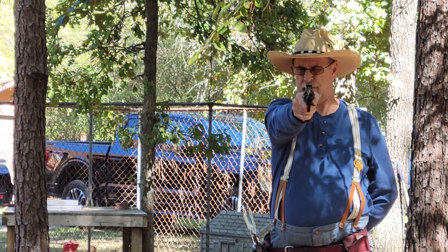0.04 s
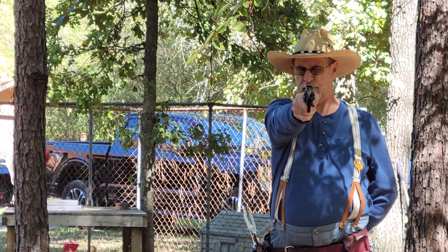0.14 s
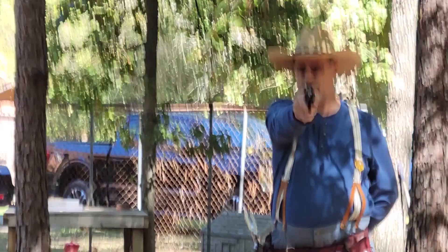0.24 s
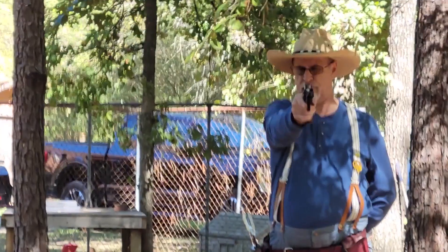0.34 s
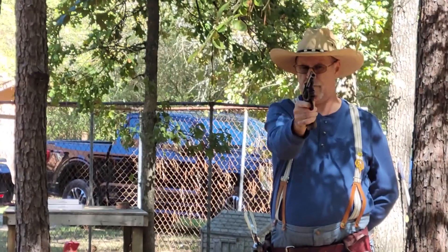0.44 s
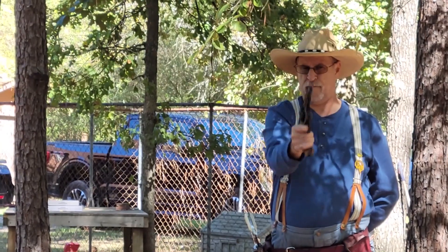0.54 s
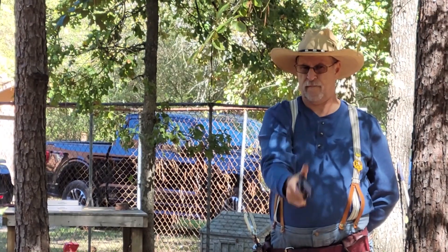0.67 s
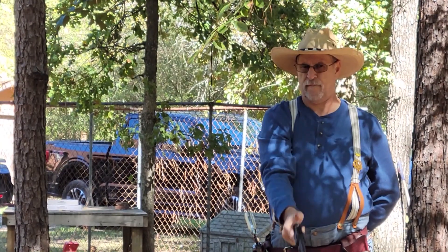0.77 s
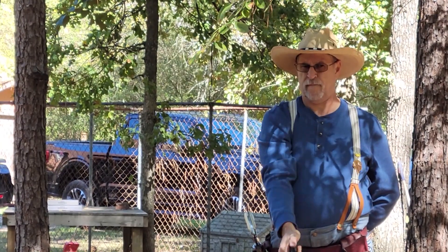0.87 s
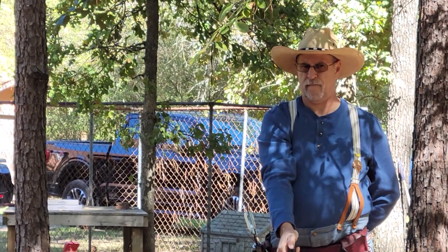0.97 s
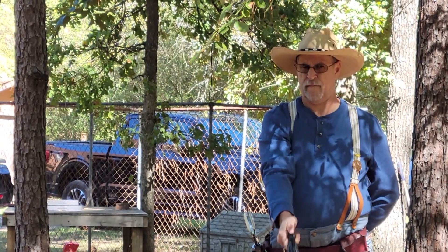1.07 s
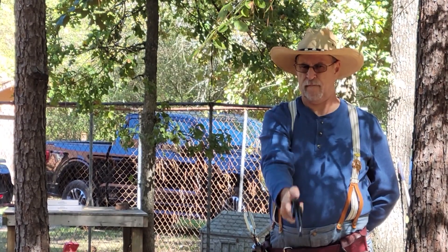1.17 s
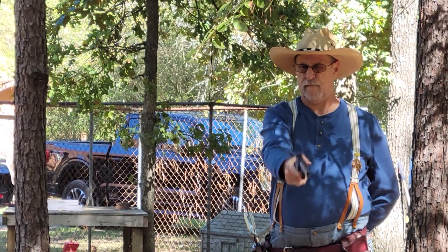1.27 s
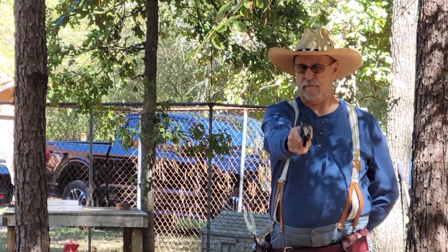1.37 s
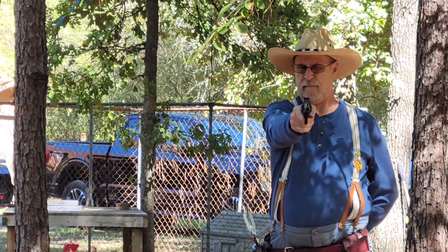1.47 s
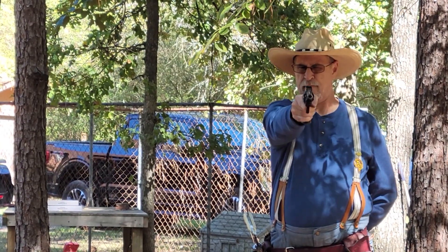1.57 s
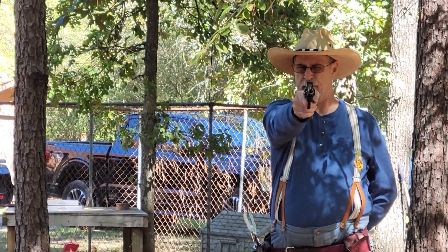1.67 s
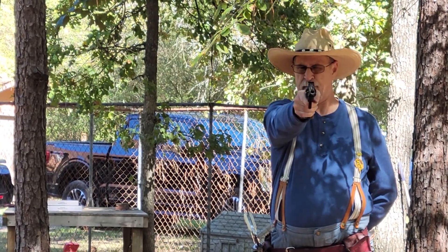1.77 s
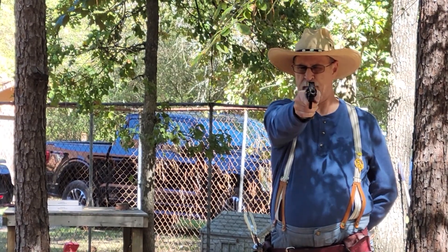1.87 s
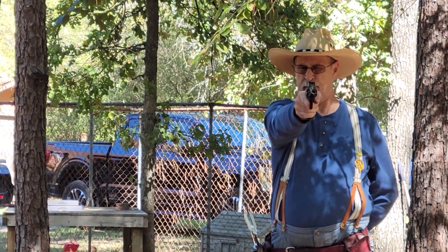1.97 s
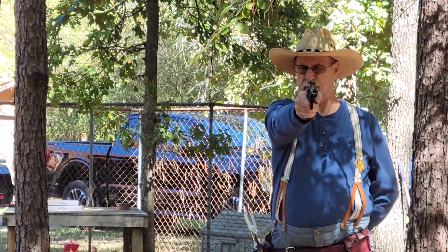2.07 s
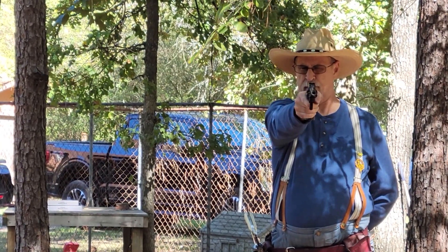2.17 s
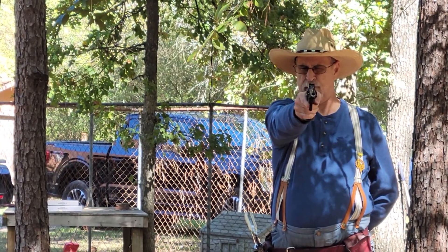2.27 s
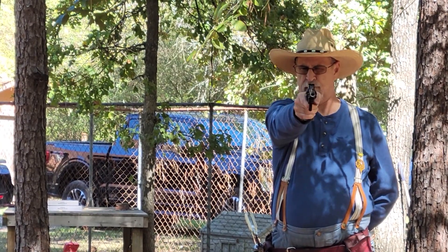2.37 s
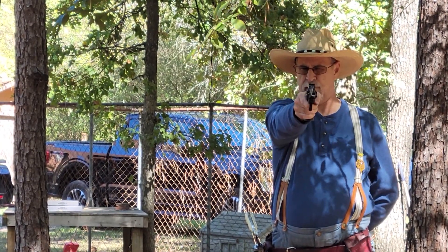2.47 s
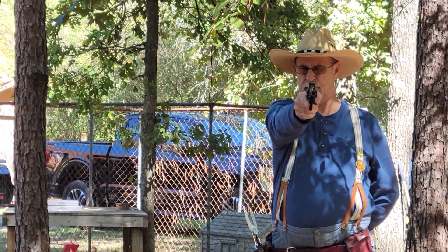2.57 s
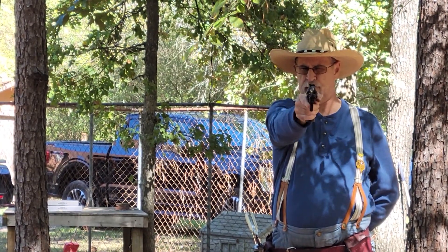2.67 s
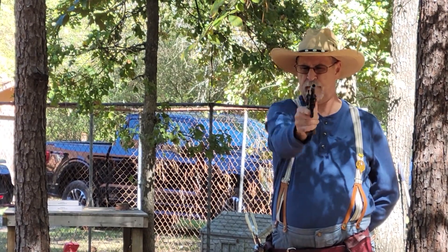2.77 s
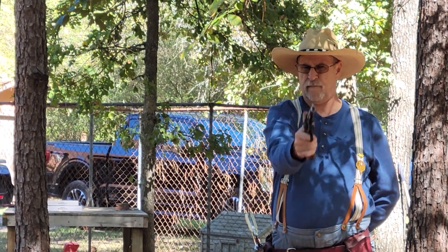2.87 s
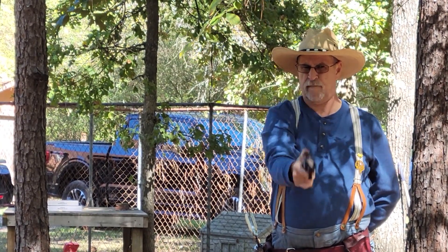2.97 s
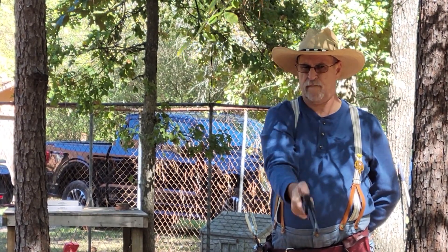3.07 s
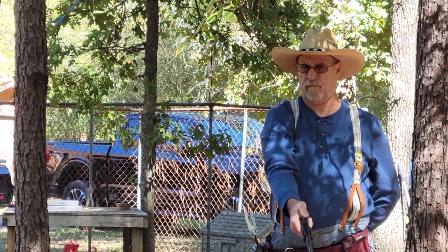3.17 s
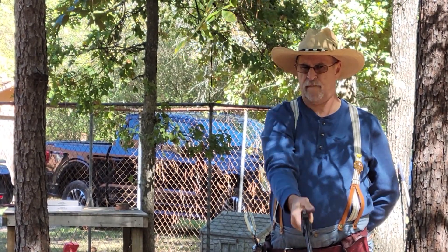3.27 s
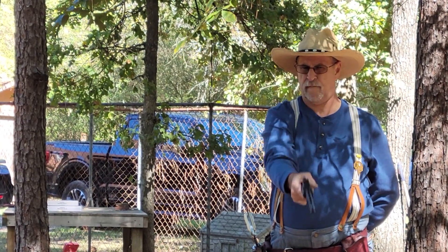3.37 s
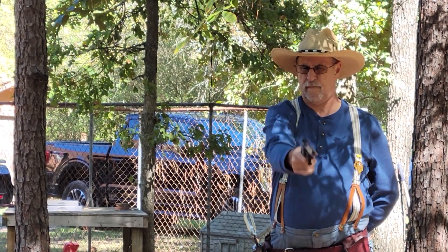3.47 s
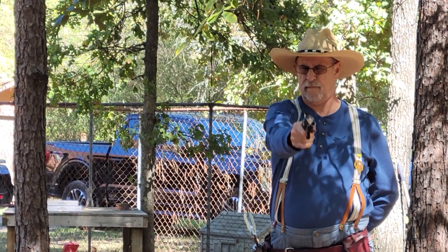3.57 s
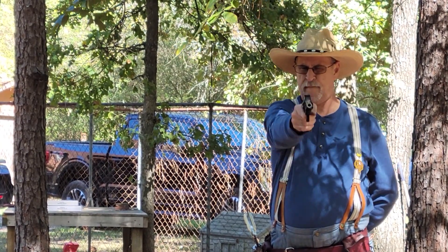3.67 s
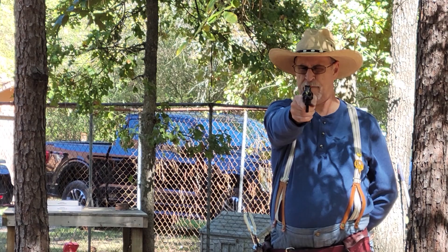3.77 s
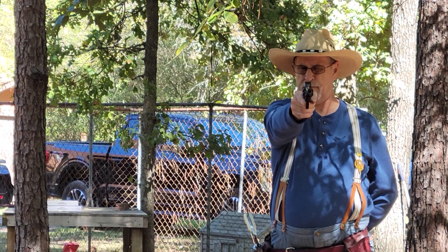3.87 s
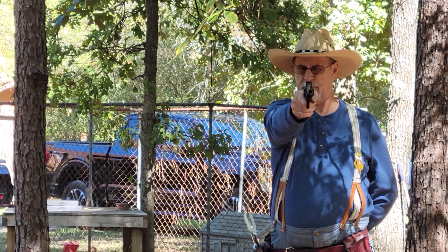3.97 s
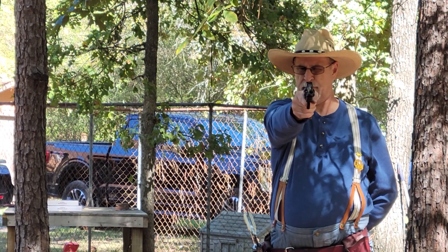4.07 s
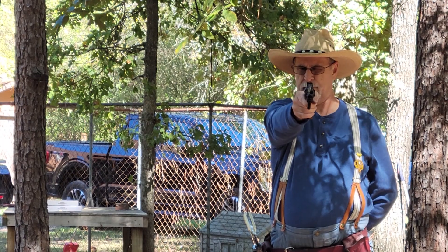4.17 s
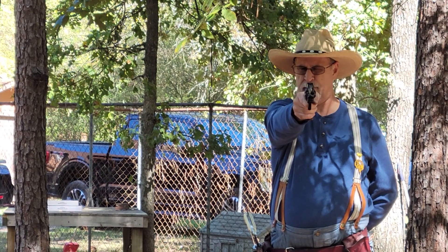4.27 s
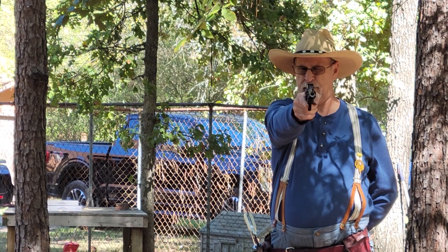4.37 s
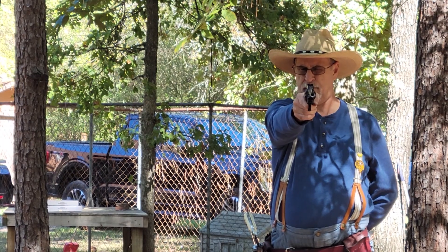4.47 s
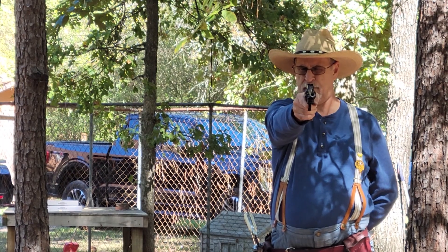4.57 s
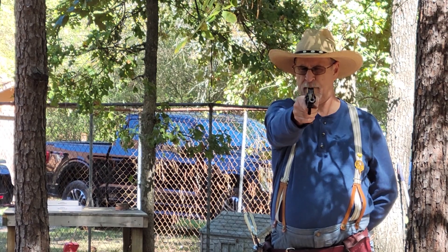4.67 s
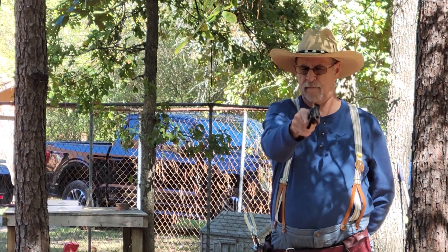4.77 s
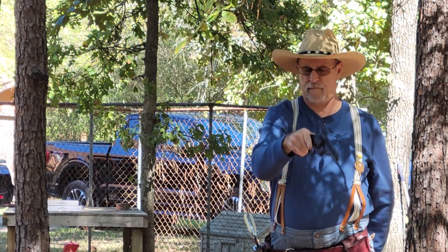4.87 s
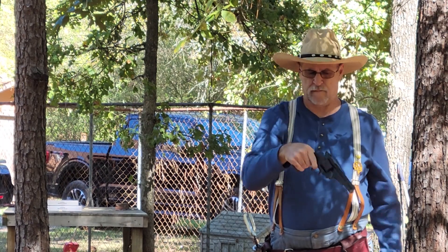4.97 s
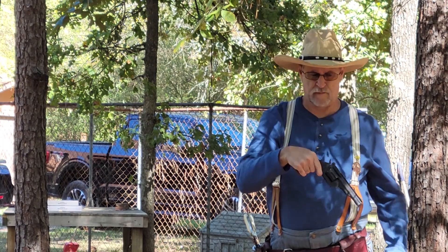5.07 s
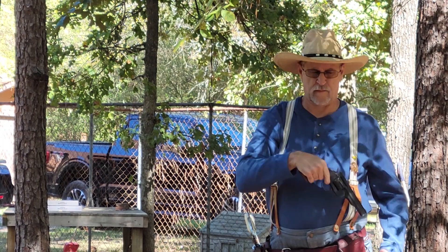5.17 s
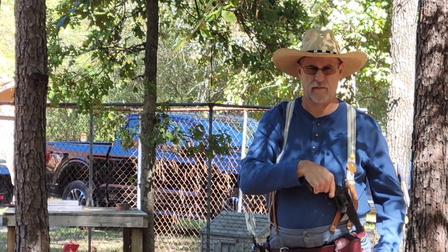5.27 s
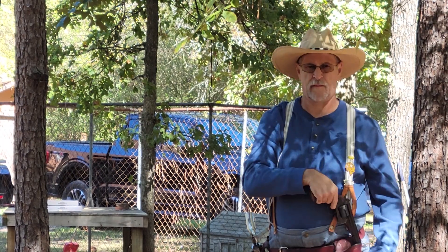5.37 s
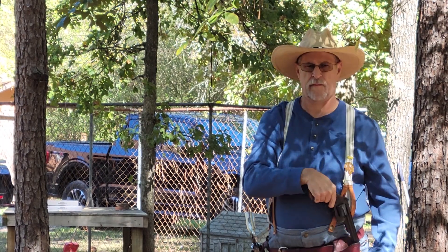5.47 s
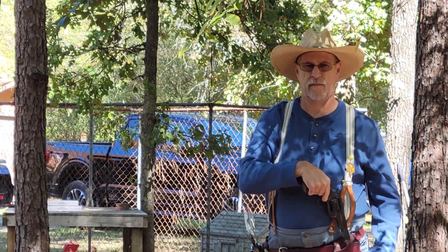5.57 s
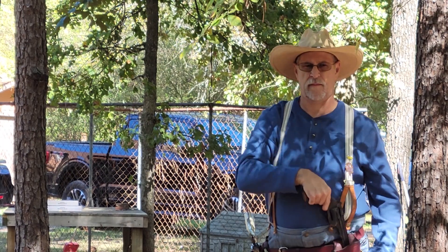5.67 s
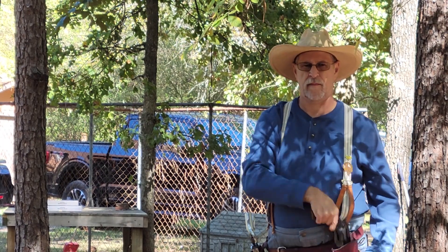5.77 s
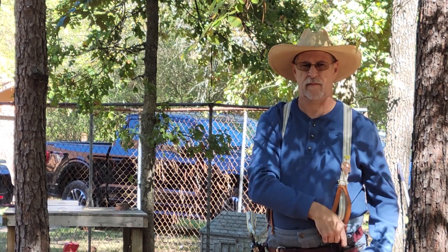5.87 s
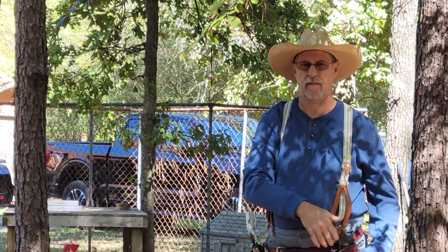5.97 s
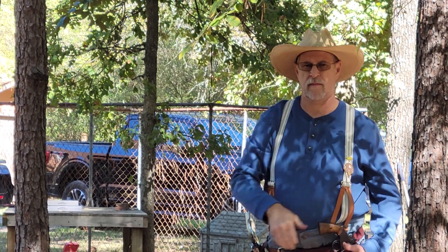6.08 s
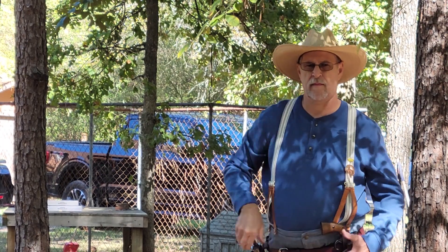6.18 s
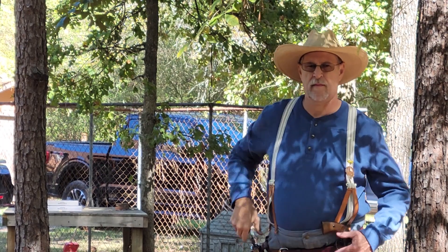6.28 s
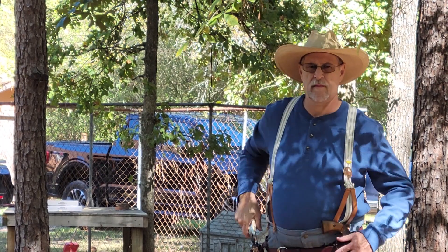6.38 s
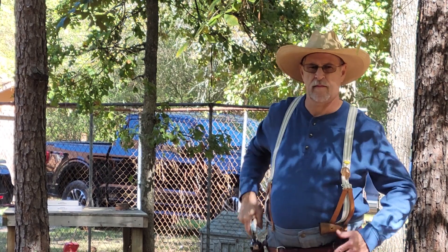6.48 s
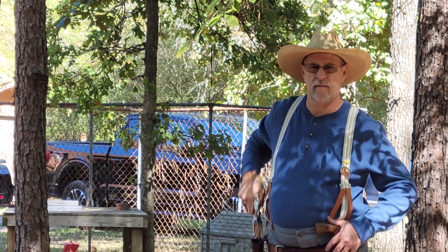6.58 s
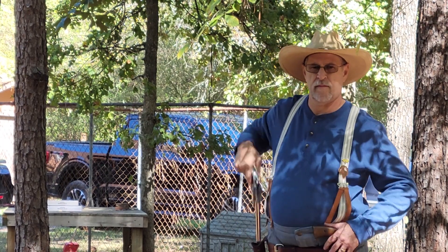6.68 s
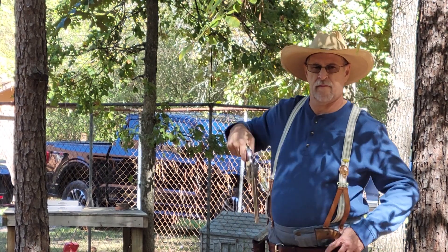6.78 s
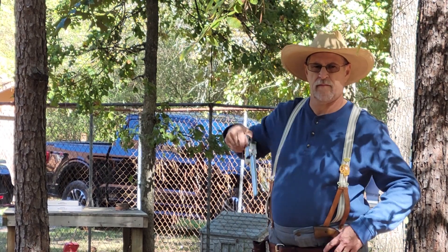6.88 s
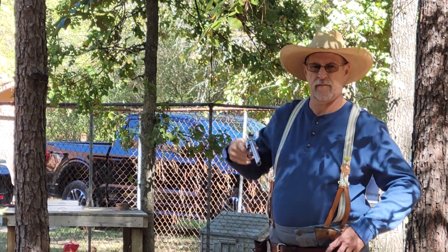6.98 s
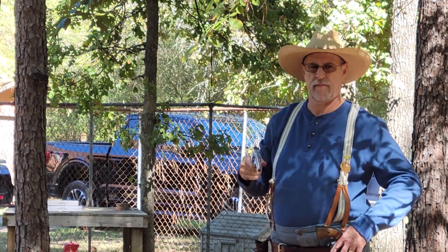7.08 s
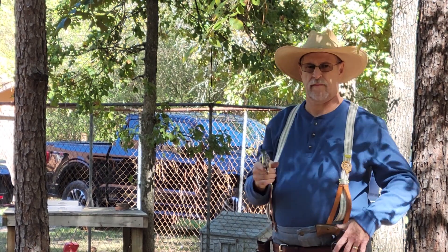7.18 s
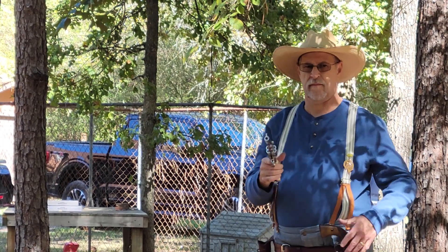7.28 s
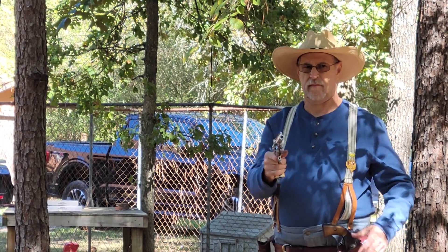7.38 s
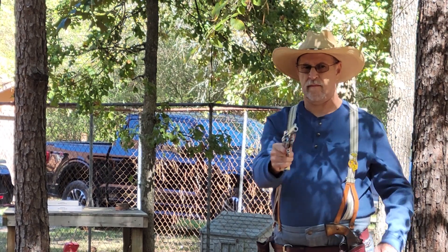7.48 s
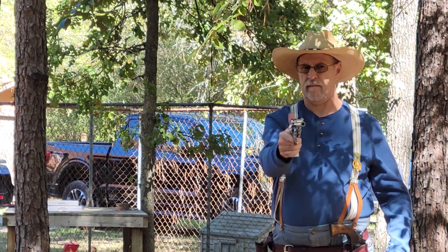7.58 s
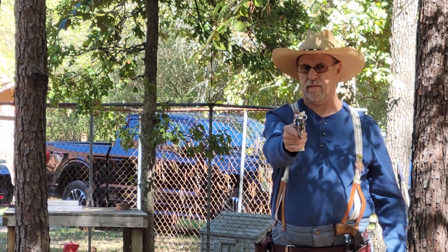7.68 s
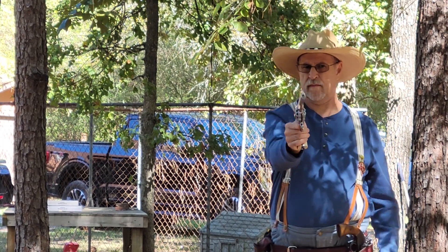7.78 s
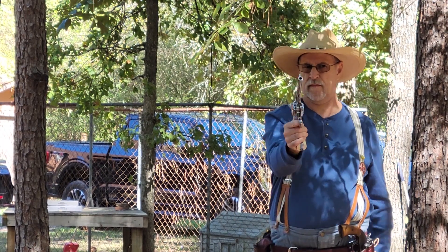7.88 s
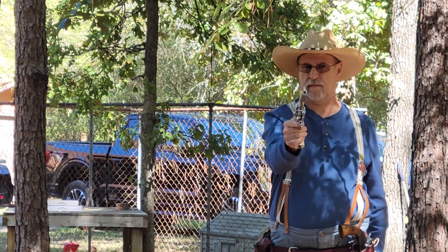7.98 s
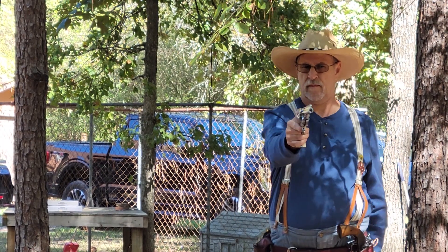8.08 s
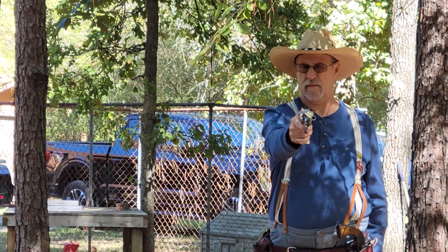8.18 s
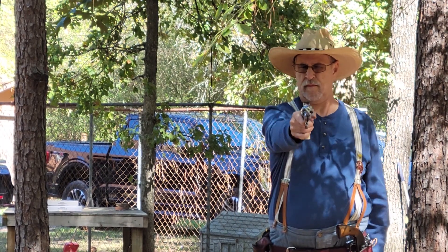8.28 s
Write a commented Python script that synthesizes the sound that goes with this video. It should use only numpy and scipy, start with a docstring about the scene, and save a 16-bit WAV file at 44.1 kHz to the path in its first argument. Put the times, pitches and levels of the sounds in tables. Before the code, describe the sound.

A gas revolver some metres away fires three times in a wooded yard, roughly two seconds apart. Each dry, sharp crack scatters off trees and fence, and almost at once a pellet splashes brightly on a steel target beside the microphone. Bright metallic overtones fade quickly while a low bell tone hums on. Crisp cocking clicks come between shots; later there is only rumble, ringing, faint cloth rubbing and a final hard click.

```python
"""In a wooded yard, a gas revolver fires three times at a bell-like steel target close to the microphone.
Each crack is a puff of noise that echoes off nearby surfaces and trees. The pellet lands about 45 ms later
as a splash of noise, and the steel, a set of dying tones, rings on for seconds.
Clicks of the gun and rubbing cloth, both made of noise, are heard over a low rumble of filtered noise.
A limiter ducks the loudest moments."""
import sys
import numpy as np
from scipy import signal
from scipy.fft import rfft, irfft
from scipy.io import wavfile
from scipy.ndimage import uniform_filter1d, minimum_filter1d

SR = 44100
rng = np.random.default_rng(int(sys.argv[2]) if len(sys.argv) > 2 else 0)


def pcm_store(signal):
    """Save signal as 16-bit PCM."""
    levels = np.round(np.clip(np.atleast_2d(signal), -1, 1) * 32767)
    wavfile.write(sys.argv[1], SR, levels.astype(np.int16).T)


N = 367794

# The three shots. Each row: crack in seconds, relative crack level in dB,
# pellet's impact in seconds, relative impact level in dB.
SHOTS = [(.1176, -1, .160, -1), (2.4106, 0, 2.457, -2), (4.4401, 0, 4.4884, 0)]
# Colour of the gun's clicks and of the swell into each crack. Each row: frequency in Hz, level in dB.
CLICK_COLOUR = [(300, -41), (1000, -32.5), (1800, -10.5), (2600, -18.5), (4000, -10), (5500, -13.5),
                (7600, -7.5), (9000, -31), (13000, -22.5), (16000, -29.5)]


def gain_of(db):
    """Turns decibels into amplitude."""
    return 10 ** (np.asarray(db) / 20)


def read(points, hz):
    """Reads a table joined by straight lines on a log-frequency axis."""
    f, value = np.transpose(points)
    return np.interp(np.log(hz + 1), np.log(f), value)


def add(mix, s, sound):
    """Adds a sound to the mix at time s in seconds, cut off at the end of the mix."""
    part = mix[:, round(s * SR):][:, :sound.shape[-1]]
    part += sound[..., :part.shape[-1]]


def coloured(x, points, tilt_db=0, size=2048):
    """Filters a sound to a colour, tilted about 5 kHz (dB per octave), with nothing heard ahead of it."""
    hz = np.fft.rfftfreq(size, 1 / SR)
    octaves = np.log2(np.maximum(hz, 500) / 5000)
    log_gain = np.log(gain_of(read(points, hz) + tilt_db * octaves))
    # The Hilbert transform gives the phase that puts the energy as early as possible.
    circle = np.r_[log_gain, log_gain[-2:0:-1]]
    taps = np.fft.ifft(np.exp(np.conj(signal.hilbert(circle)))).real
    return signal.fftconvolve(x, taps[None], axes=1)


def burst(t60, likeness, size=4096):
    """A dying puff of noise of energy 1 in each channel; likeness is what left and right share (0-1)."""
    noise = rng.standard_normal((3, size)) * gain_of(-60 * np.arange(size) / SR / t60)
    share = np.clip(likeness, 0, 1)
    pair = np.sqrt(share) * noise[0] + np.sqrt(1 - share) * noise[1:]
    return pair / np.linalg.norm(pair, axis=1, keepdims=True)


def mode(t, hz, t60, db, pan_db, lead):
    """One dying tone, with its own level and phase (lead, in radians) at left and right."""
    sides = gain_of([[pan_db / 2], [-pan_db / 2]])
    sides = sides / np.sqrt(np.mean(sides ** 2))
    phase = 2 * np.pi * (hz * t + rng.random()) + np.array([[lead / 2], [-lead / 2]])
    return sides * gain_of(db - 60 * t / t60) * np.sin(phase)


def boom_db(steep=2.0):
    """Level of the rumble: one smooth rise and slower fall after each shot."""
    rest_db, peak_s = -2, .42
    # Height of the swell after each shot, in dB.
    heights_db = [7.5, 4, 4]
    level_db = np.full(N, float(rest_db))
    for (s, *_), height_db in zip(SHOTS, heights_db):
        age = np.maximum(np.arange(N) / SR - s, 0) / peak_s
        level_db = level_db + height_db * (age * np.exp(1 - age)) ** steep
    return level_db


def outdoors(rumble_edge_hz=220):
    """Noise split into a distant rumble, swelling after each shot, and faint steady air noise."""
    # Background before drones and swells. Each row: frequency in Hz, level in dB per Hz.
    air = [(22, -83), (40, -72.5), (62, -62), (100, -59), (165, -75), (300, -79.5), (600, -85.5),
           (1300, -91.5), (2200, -103), (4600, -123), (7400, -114), (8500, -140), (12300, -135),
           (16000, -147)]
    # How alike left and right are. Each row: frequency in Hz, likeness from 0 to 1.
    air_likeness = [(30, .93), (250, 0.91), (700, 0.26), (2000, .4), (8000, 0.65)]
    # Droning bands in the rumble. Each row: frequency in Hz, width in Hz, boost in dB.
    drone = [(88.6, 4.1, 5.5), (105.6, 2.7, 4.5), (143.6, 15, 7.5), (209.3, 5.2, 5), (255.9, 4, 8)]
    hz = np.fft.rfftfreq(N, 1 / SR)
    a, b = rfft(rng.standard_normal((2, N)))
    same = np.clip(read(air_likeness, hz), -1, 1)
    pair = np.array([a, same * a + np.sqrt(1 - same ** 2) * b])
    spectrum = pair * gain_of(read(air, hz)) * np.sqrt(SR / 2)
    drone_db = sum(db / (1 + (2 * (hz - f) / width) ** 2) for f, width, db in drone)
    spectrum = spectrum * gain_of(drone_db)
    low = 1 / (1 + (hz / rumble_edge_hz) ** 4)
    rumble = irfft(spectrum * low, N)
    return gain_of(boom_db()) * rumble + irfft(spectrum * (1 - low), N)


def target(ring_db=0.06, release_s=0.079, release_share=.15):
    """Each hit starts the steel's modes anew; they die away, each at first held back by its own amount."""
    # Tones of the steel; each pellet lands on another spot and leaves another mix.
    # Each row: frequency in Hz, time to fall 60 dB in seconds, level in dB after hits 1, 2 and 3,
    # left over right in dB, left's phase lead in radians.
    steel = [ (467, 26, -32, -19.7, -19.3, -1.5, -.3), (832, 1.7, -60, -34, -34, 0, -1.1),
             (1045, 8.5, -52, -59, -43, 6, -2.1), (1173, 10, -36, -51, -38, 12, 2.5),
             (1370, .6, -55, -38, -39, 0, -1), (1480, 5.2, -25, -56, -43, 6, -1),
             (1900, .3, -40, -25, -25, 0, -1), (1990, 1.28, -31, -44, -34, 6, -2.8),
             (2741, 1.45, -15, -43, -19, 6, -1.9), (2800, 1.8, -38, -44, -32, 0, -1.5),
             (3080, .47, -41, -44, -27, -5, -1.9), (3169, 1.17, -18, -31, -17, 6, -2.1),
             (3486, .74, -1, -34, -20, 3, -2.1), (3870, .54, -21, -11, -22, -1, -.5),
             (3932, .41, -16, -18, -20, -5, -.4), (4266, .71, -12, -32, -37, -3, 1.2),
             (4288, 1.29, -31, -24, -26, 4, -3.1), (4334, .6, -37, -15, -14, -4, 2.5),
             (4712, .61, -24, -43, -21, -9, 2.1), (5418, .55, -30, -26, -10, -20, -3.1),
             (6109, .52, -16, -35, -20, 1, 2.2), (6204, .5, -21, -52, -41, 15, -2.5),
             (6574, .56, -34, -16, -17, 0, 2.2), (7429, .47, -26, -9, -14, -8, .4),
             (7588, .51, -22, -33, -20, -11, -2.7), (9026, .39, -26, -32, -18, 14, 3),
             (9892, .44, -29, -44, -35, 3, .3), (10529, .38, -20, -40, -19, 13, -.1),
             (10814, .39, -23, -39, -14, 16, -1.5), (11692, .31, -10, -5, -11, 10, -1.5),
             (11958, .32, -24, -6, -6, -13, -2.6), (12205, .38, -13, -26, -28, -2, -2.7),
             (13011, .27, -18, -17, -40, 16, 1.3), (13787, .26, -11, -25, -13, -7, -1.4),
             (13908, .2, -5, -35, -5, 14, -1.5), (14918, .33, -13, -45, -16, -1, 1.3),
             (15215, .36, -18, -28, -30, 16, .8)]
    # Tones already ringing at the start. Each row: frequency in Hz, level in dB.
    ringing = [(467, -31), (1045, -55), (1173, -52)]
    # Tones are held back by differing amounts at each hit, as by a limiter, the very top slightly raised.
    # Each row: frequency in Hz, dB held back at the hit.
    held_back = [(467, 12), (1500, 11), (3200, 13.5), (4300, 7.5), (7400, 3), (12000, 8), (15000, -1.5)]
    out = np.zeros((2, N))
    hits = [shot[2] for shot in SHOTS] + [N / SR]
    t = np.arange(round(hits[0] * SR)) / SR
    for hz, db in ringing:
        # All of these die and spread like the first tone of the steel.
        add(out, 0, mode(t, hz, steel[0][1], db, *steel[0][-2:]))
    for k in range(len(SHOTS)):
        # The ring stops where the next hit starts.
        t = np.arange(round(hits[k + 1] * SR) - round(hits[k] * SR)) / SR
        for hz, t60, *levels, pan_db, lead in steel:
            # The hold shrinks to nothing, sooner for short tones.
            hold = np.maximum(1 - t / min(release_s, release_share * t60), 0)
            level_db = levels[k] + ring_db - hold * read(held_back, hz)
            add(out, hits[k], mode(t, hz, t60, level_db, pan_db, lead))
    return out


def lead_in(swell_db=11, rise_t60=0.055, tilt_db=2, low_db=-26, low_hz=170, low_t60=0.054, lead_s=0.014):
    """A reversed puff of noise swells into each crack, with a short low tone just before it."""
    out, t = np.zeros((2, N)), np.arange(SR // 4) / SR
    low_tone = gain_of(low_db - 60 * t / low_t60) * np.sin(2 * np.pi * low_hz * t)
    for s, *_ in SHOTS:
        swell_in = burst(rise_t60, 0.44)[:, ::-1]
        add(out, s - swell_in.shape[1] / SR, gain_of(swell_db) * coloured(swell_in, CLICK_COLOUR, tilt_db))
        add(out, s - lead_s, low_tone)
    return out


def cracks(crack_db=13, crack_t60=0.0067, slap_db=3):
    """Gas bursts from the muzzle as puffs of noise; hard surfaces throw back single darker slaps."""
    # Colours of the burst and of the slaps. Each row: frequency in Hz, level in dB.
    blast = [(60, -11.5), (250, -11), (600, -5.5), (1100, -1), (2200, 1), (4500, 10), (7300, 5), (9500, -8),
             (13000, -7.5), (16000, -9)]
    slap = [(60, -6), (300, 2), (1000, 6), (3000, 5), (6500, 1), (9500, -10), (13000, -7), (16000, -9)]
    # Echoes from nearby surfaces. Each row: delay in seconds, relative level in dB.
    near_echoes = [(.0016, 0), (.0116, 7), (.0134, -3), (.0235, -3)]
    out = np.zeros((2, N))
    for s, db, _, _ in SHOTS:
        add(out, s, gain_of(db + crack_db) * coloured(burst(crack_t60, .75), blast))
        for delay, echo_db in near_echoes:
            add(out, s + delay, gain_of(db + slap_db + echo_db) * coloured(np.ones((2, 1)), slap))
    return out


def yard(x, rise=0.0021, near_db=5, near_s=.045, lumpy_db=3, far_db=4, far_s=0.51):
    """Trunks, leaves and fence echo as uneven dying noise: near ones strongest, far trees late, treble brief."""
    # Colour of the scatter. Each row: frequency in Hz, relative level in dB.
    scatter = [(100, 1.5), (500, -4), (1200, -6.5), (2500, -6), (5000, -0.5), (9000, 4), (15000, 7)]
    # Its basic decay. Each row: frequency in Hz, time to fall 60 dB in seconds.
    scatter_t60 = [(150, .55), (1000, .62), (3000, .58), (5000, .45), (7500, .35), (10000, .19),
                   (15000, .19)]
    hz, t, z = signal.stft(rng.standard_normal((2, SR)), SR, nperseg=256)
    t60 = read(scatter_t60, hz)[:, None]
    lumps = rng.standard_normal(z.shape[1:])
    lumps = uniform_filter1d(uniform_filter1d(lumps, size=12, axis=0), size=4, axis=1)
    near = near_db / (1 + (t / near_s) ** 4)
    far = far_db * (1 - 1 / (1 + (t / far_s) ** 4))
    level_db = read(scatter, hz)[:, None] - 60 * t / t60 + near + far + lumpy_db * lumps / lumps.std()
    tail = signal.istft(z * gain_of(level_db), SR, nperseg=256)[1][:, :SR]
    tail = tail * (1 - np.exp(-np.arange(SR) / SR / rise))
    tail = tail + 0.1 * tail[::-1]  # a little of each side in the other
    return signal.fftconvolve(x, tail / np.linalg.norm(tail[0]), axes=1)[:, :N]


def impacts(impact_db=16, impact_t60=0.031, spread_s=.003):
    """The pellet's splash of noise builds as it spreads over the steel, then dies."""
    # Colour of the splash. Each row: frequency in Hz, level in dB.
    splash_colour = [(200, -17.5), (800, -18), (2000, -10), (4000, 1), (7500, 6), (9500, -7.5),
                     (13000, -2.5), (16000, -3)]
    out = np.zeros((2, N))
    for _, _, s, db in SHOTS:
        splash = burst(impact_t60, 0.25)
        splash = splash * (1 - np.exp(-np.arange(splash.shape[1]) / SR / spread_s))
        add(out, s, gain_of(db + impact_db) * coloured(splash, splash_colour))
    return out


def shimmer(count=70):
    """Weak modes of the steel crowd between the strong ones; the higher they are, the sooner they die."""
    # Typical level of a weak mode before luck and hit strength. Each row: frequency in Hz, level in dB.
    overtones = [(1200, -42), (2000, -37), (3500, -34), (6000, -30), (8000, -29), (9800, -40), (12500, -25),
                 (15800, -25)]
    out, t = np.zeros((2, N)), np.arange(SR) / SR
    # One pitch at random in each of many equal steps.
    places = np.arange(count) + rng.random(count)
    pitches = np.interp(places, [0, count], [overtones[0][0], overtones[-1][0]])
    for hz in pitches:
        pan_db, lead = rng.uniform(-14.5, 6.2), rng.uniform(-np.pi, np.pi)
        t60 = .48 * np.sqrt(5000 / hz)
        for _, _, s, db in SHOTS:
            luck_db = rng.uniform(-16, 3)
            add(out, s, mode(t, hz, t60, db + read(overtones, hz) + luck_db, pan_db, lead))
    return out


def rattles():
    """The target jumps on its mount and pings, each ping one short tone."""
    # Each row: start in seconds, frequency in Hz, time to fall 60 dB in seconds, level in dB.
    pings = [(0.191, 1600, .04, -19), (.194, 2075, 0.33, -26.5), (2.509, 5170, .08, -28.5),
             (2.62, 5300, .1, -38)]
    out, t = np.zeros((2, N)), np.arange(SR // 2) / SR
    for s, hz, t60, db in pings:
        add(out, s, mode(t, hz, t60, db, 0, 0))
    return out


def action(click_db=9, click_t60=0.057, knock_hz=110, knock_t60=0.084, early_s=0.0051, early_db=-14):
    """Each click is a puff of noise with a dull knock, and a fainter puff just before softens its start."""
    # Hammer, cylinder and holster clicks. Each row: start in seconds, relative level in dB,
    # brightness in dB per octave, low knock in dB.
    clicks = [(.635, -38.5, 17, -67), (.808, -33.5, 8, -72), (.875, -28, -8, -63), (1.0096, -7, 1, -38),
              (2.9965, -14, 6, -52), (3.0771, -5.5, -2, -30), (3.2592, -25.5, -3.5, -75),
              (5.328, -36.5, -3, -69.5), (6.3256, -32, -3, -71), (7.009, -28, -3, -64.5),
              (8.018, -28.5, -2.5, -70), (8.101, -5, -1.5, -25)]
    out, t = np.zeros((2, N)), np.arange(SR // 4) / SR
    knock = np.sin(2 * np.pi * knock_hz * t) * gain_of(-60 * t / knock_t60)
    for s, db, tilt_db, knock_db in clicks:
        early_puff = coloured(burst(click_t60, .5), CLICK_COLOUR, tilt_db)
        add(out, s - early_s, gain_of(db + click_db + early_db) * early_puff)
        click = coloured(burst(click_t60, 0.34), CLICK_COLOUR, tilt_db)
        add(out, s, gain_of(db + click_db) * click)
        add(out, s, gain_of(knock_db) * knock)
    return out


def rustle(uneven_db=3, sleeve_rise_s=0.26):
    """Cloth and leather rub as noise of uneven level; each arm movement swells and fades as one arch."""
    # Arm movements as the guns are swapped.
    # Each row: middle in seconds, length in seconds, level in dB before colouring.
    rubs = [(5.837, .12, -67), (6.277, .4, -77.5), (7.082, 0.67, -76), (8.021, 0.41, -67.5)]
    # Colour of rubbing cloth and leather. Each row: frequency in Hz, level in dB.
    cloth = [(500, -11.5), (2000, 4), (3200, -0.5), (4600, -8), (7400, 4), (8600, -20.5), (12500, -16),
             (16000, -25)]
    sleeve_from_s, sleeve_db = 5.65, -83  # the sleeve brushes faintly from here to the end
    t = np.arange(N) / SR
    strokes = uniform_filter1d(rng.standard_normal(N), size=2000)
    level = gain_of(sleeve_db) * np.clip((t - sleeve_from_s) / sleeve_rise_s, 0, 1)
    for s, length, db in rubs:
        level = level + gain_of(db) * np.exp(-(2 * (t - s) / length) ** 2)
    level = level * gain_of(uneven_db * strokes / strokes.std())
    return coloured(level * rng.standard_normal((2, N)), cloth)[:, :N]


def scene(crack_wet_db=3, impact_wet_db=-12, click_wet_db=-11):
    """The gun is some metres off and wakes the yard; the target is near, and only its splash echoes faintly."""
    gun, splash, clicks = cracks(), impacts(), action()
    sent = gain_of(crack_wet_db) * gun + gain_of(impact_wet_db) * splash + gain_of(click_wet_db) * clicks
    revolver = gun + clicks + lead_in()
    steel_target = splash + target() + rattles() + shimmer()
    return revolver + steel_target + yard(sent) + rustle() + outdoors()


def record(dry, ceiling_db=-2.5, recovery_db_per_s=260):
    """A peak limiter clamps at once and lets go steadily; then a low-pass removes the top treble."""
    edge_hz = 16250
    over_db = np.maximum(20 * np.log10(abs(dry).max(0) + 1e-9) - ceiling_db, 0)
    # Hold each peak's excess while it shrinks at the recovery rate.
    fall = np.arange(N) / SR * recovery_db_per_s
    held_db = np.maximum.accumulate(over_db + fall) - fall
    duck_db = uniform_filter1d(minimum_filter1d(-held_db, size=89), size=89)  # about 2 ms
    lowpass = signal.firwin(511, edge_hz, window=("kaiser", 9), fs=SR)
    return signal.oaconvolve(dry * gain_of(duck_db), lowpass[None], "same", axes=1)


dry = scene()
out = record(dry)
pcm_store(out)
```